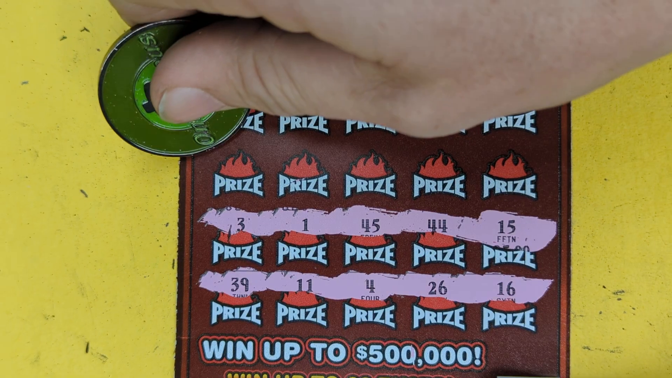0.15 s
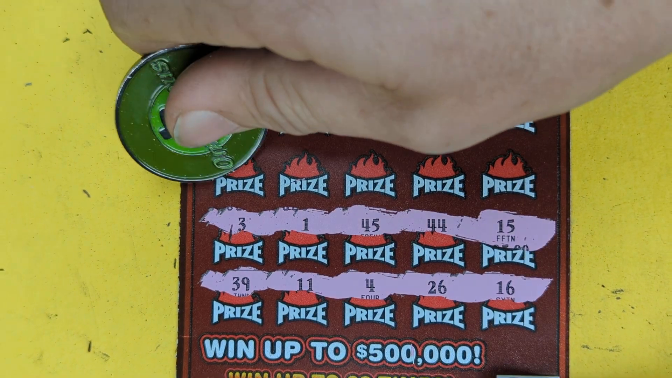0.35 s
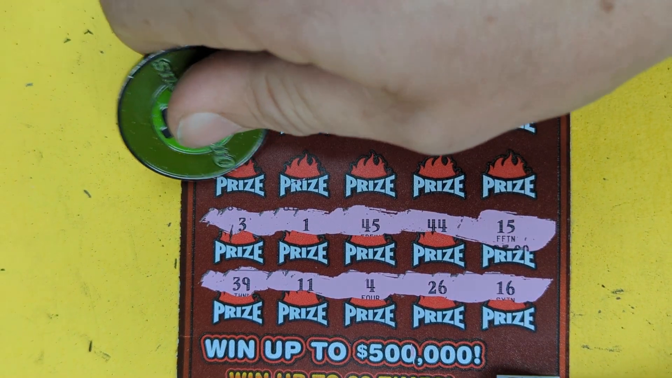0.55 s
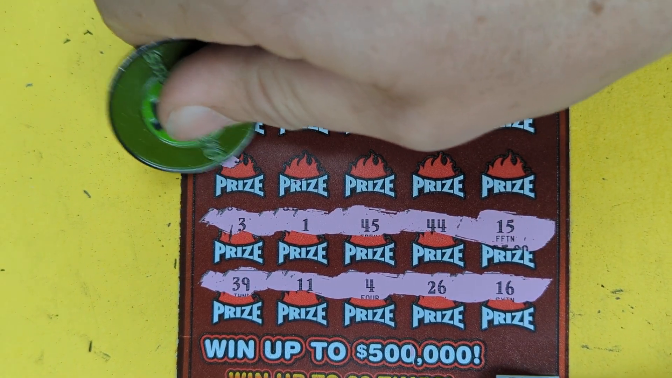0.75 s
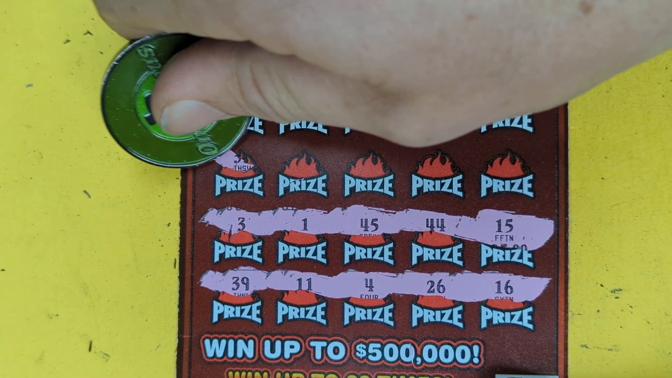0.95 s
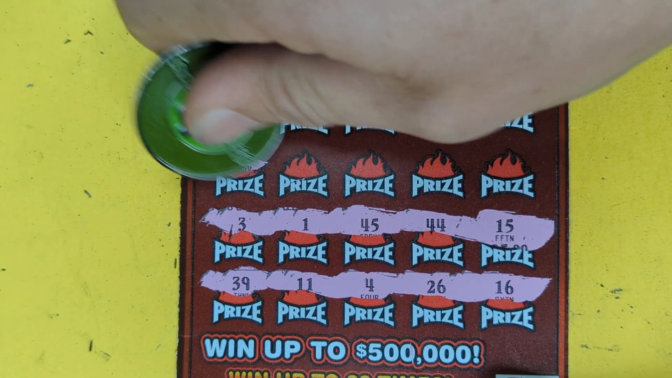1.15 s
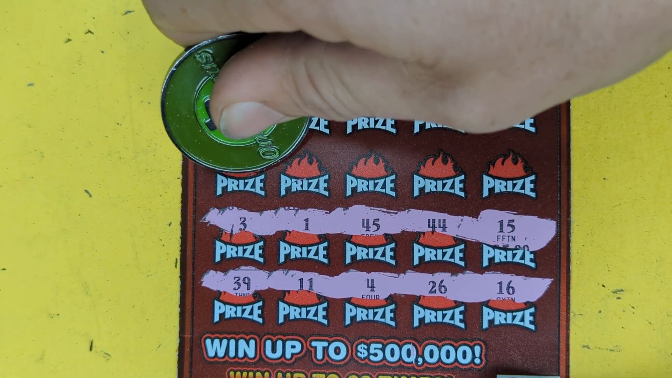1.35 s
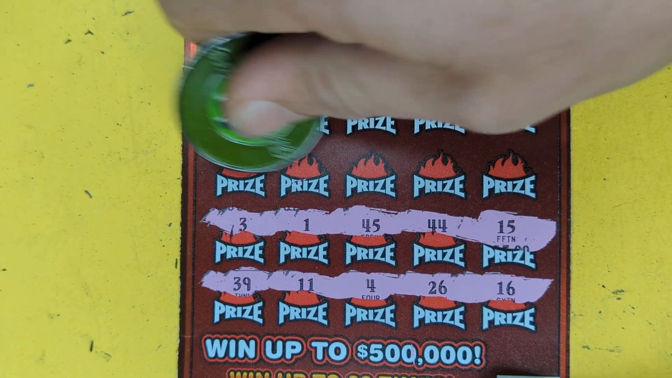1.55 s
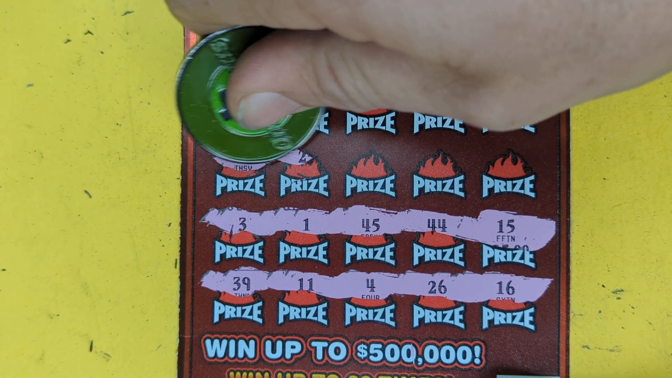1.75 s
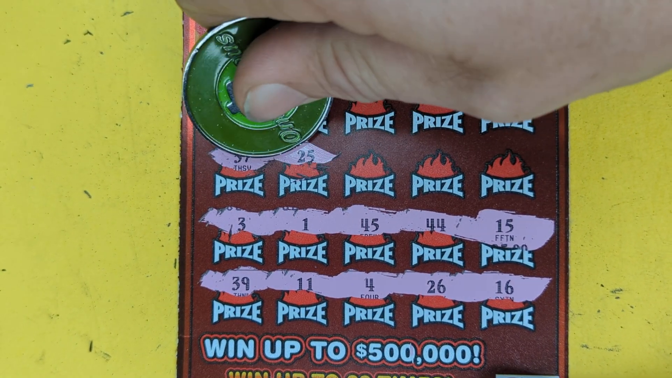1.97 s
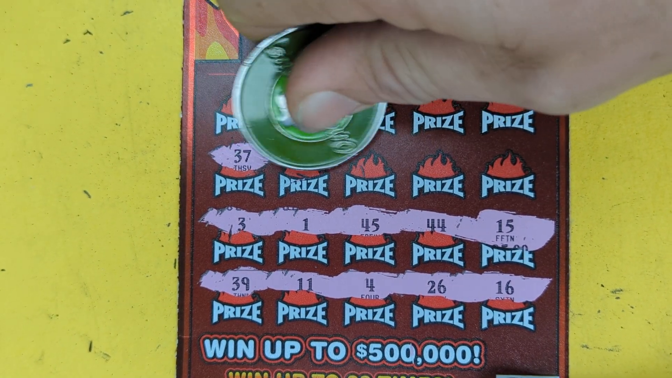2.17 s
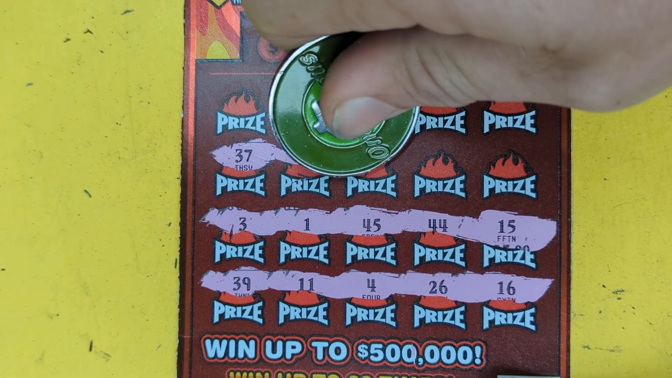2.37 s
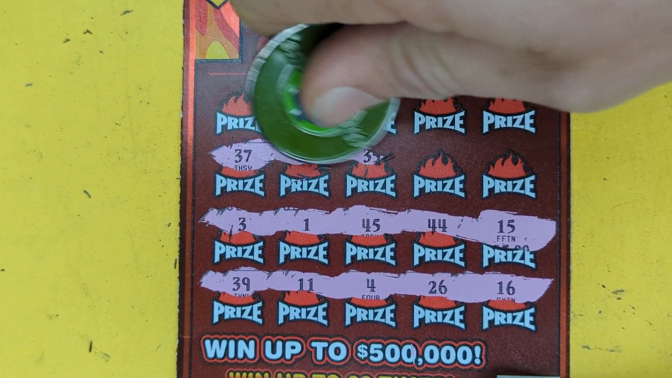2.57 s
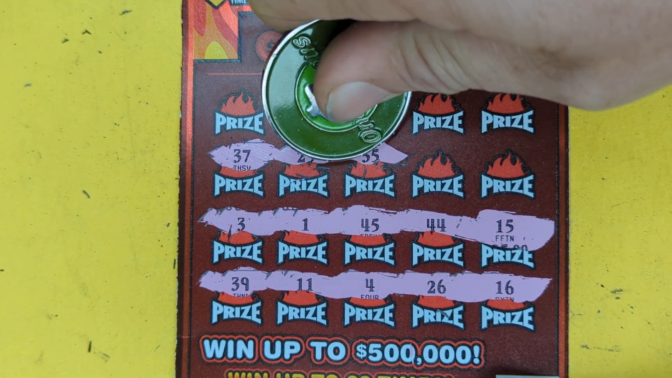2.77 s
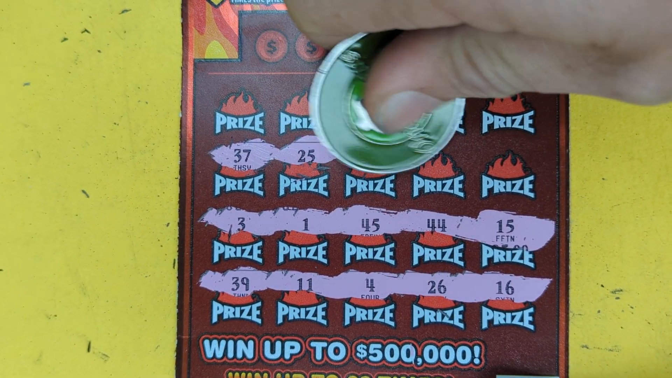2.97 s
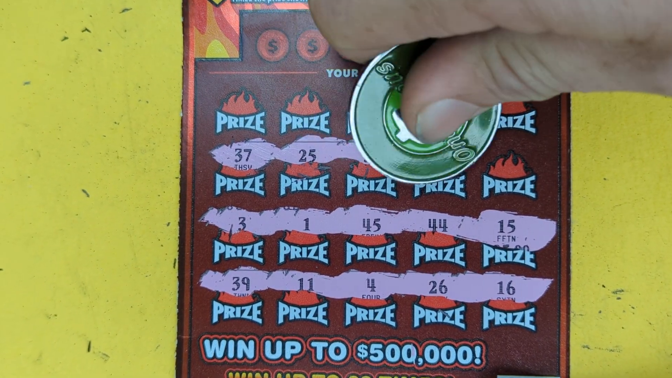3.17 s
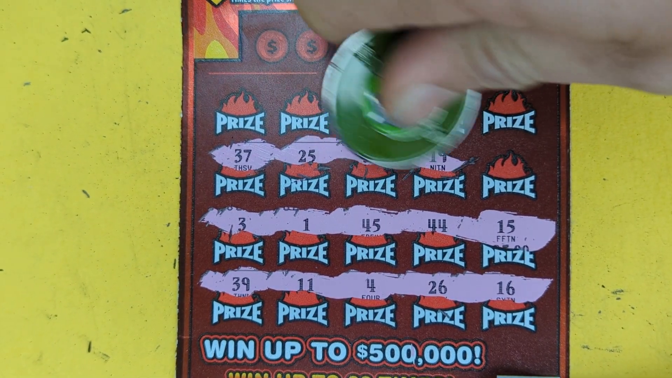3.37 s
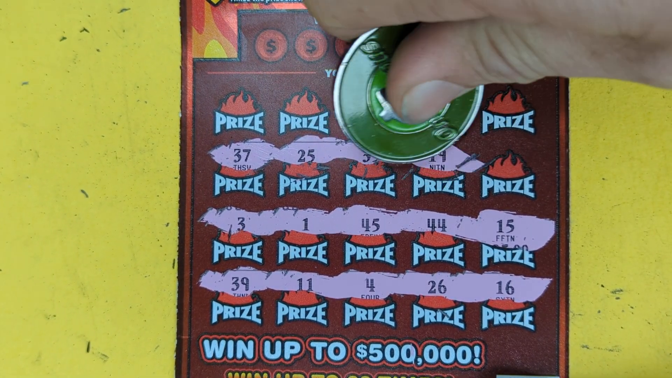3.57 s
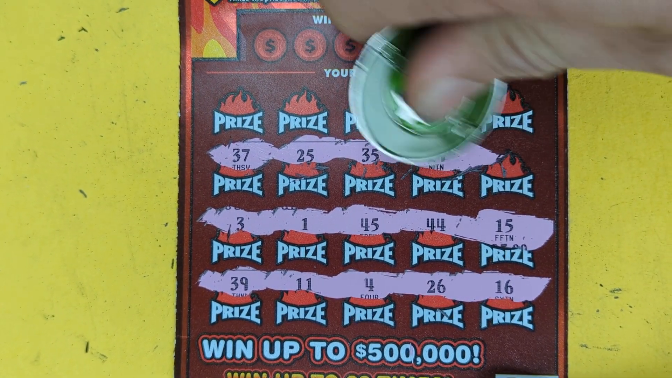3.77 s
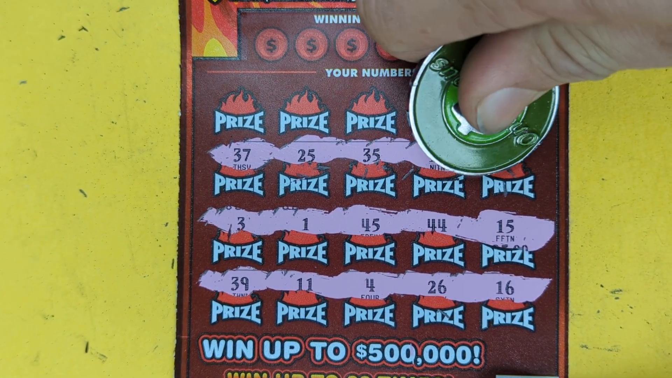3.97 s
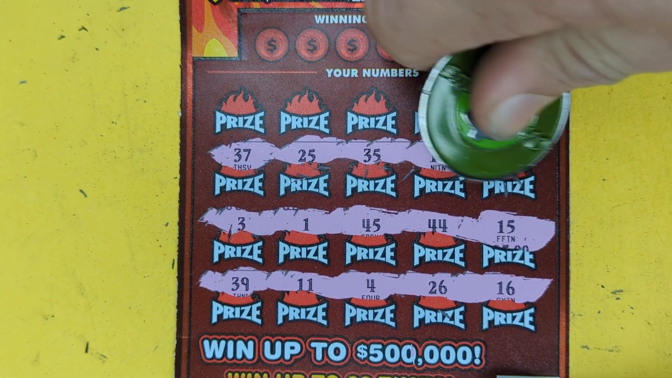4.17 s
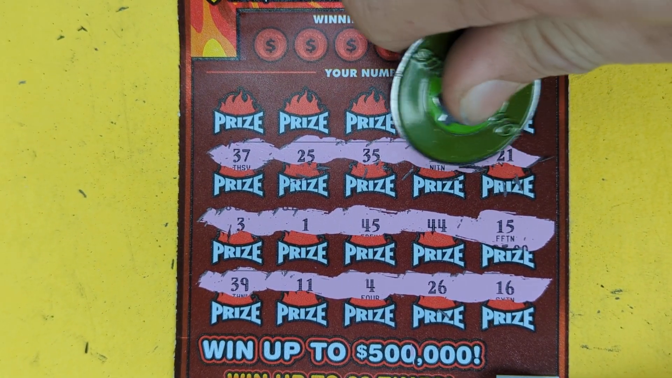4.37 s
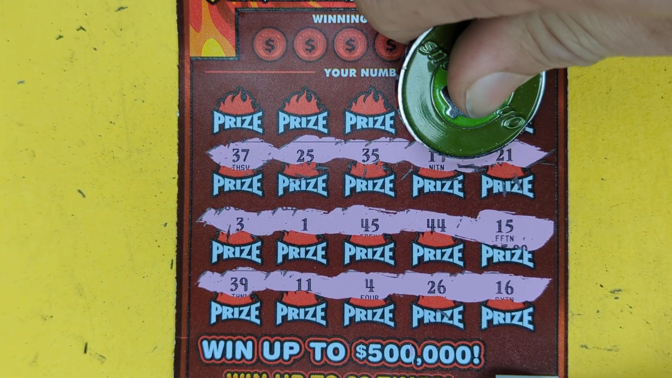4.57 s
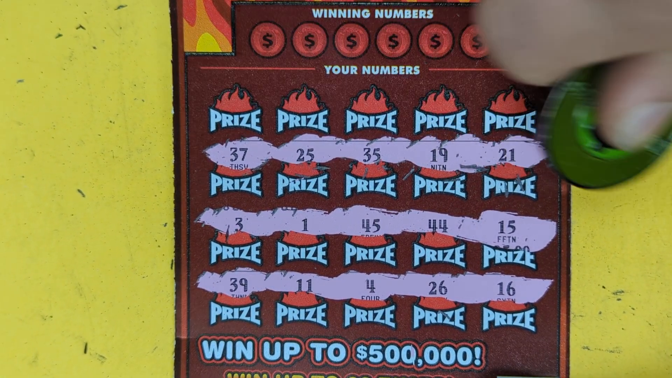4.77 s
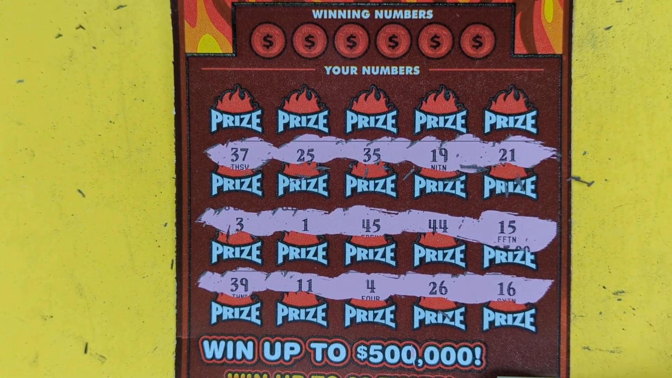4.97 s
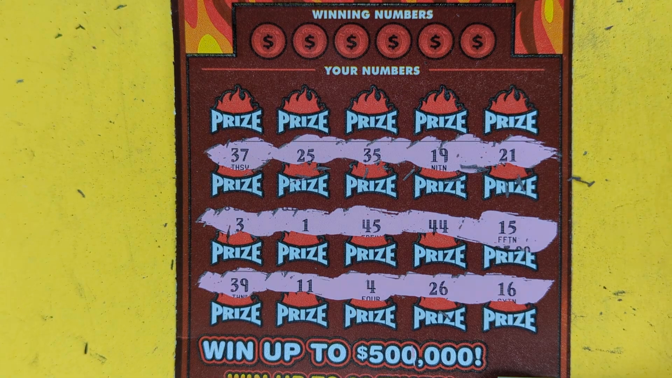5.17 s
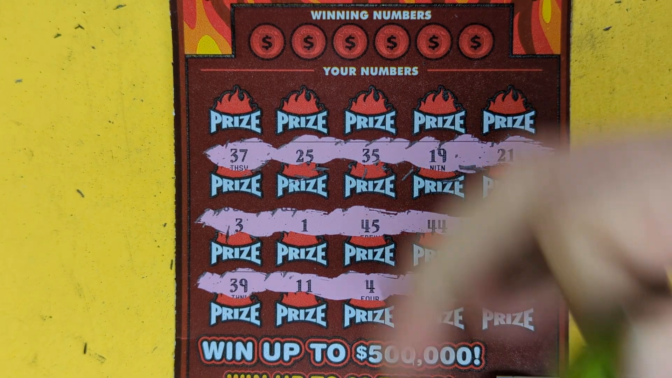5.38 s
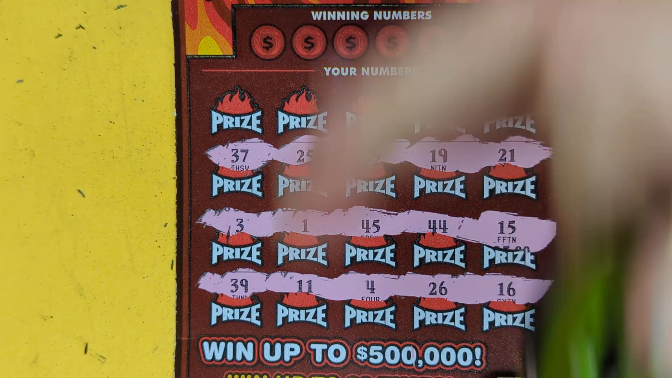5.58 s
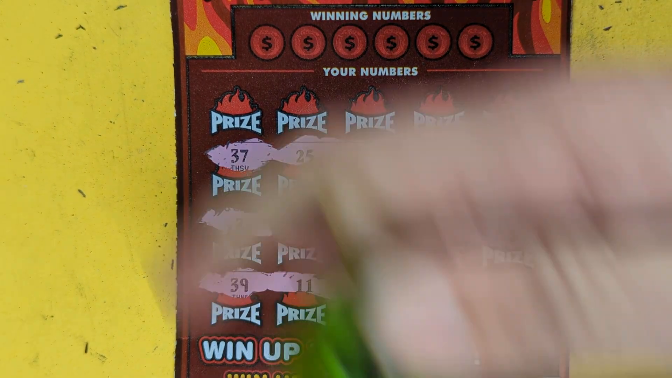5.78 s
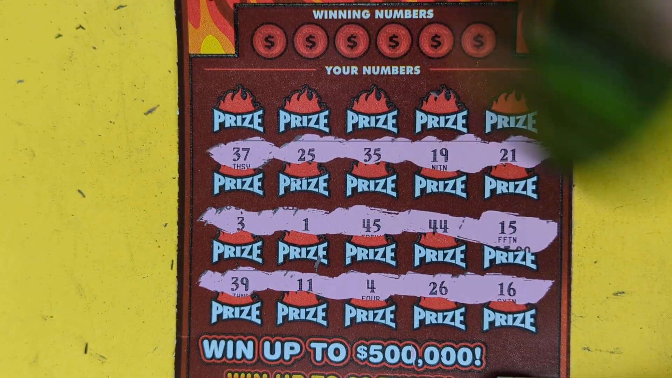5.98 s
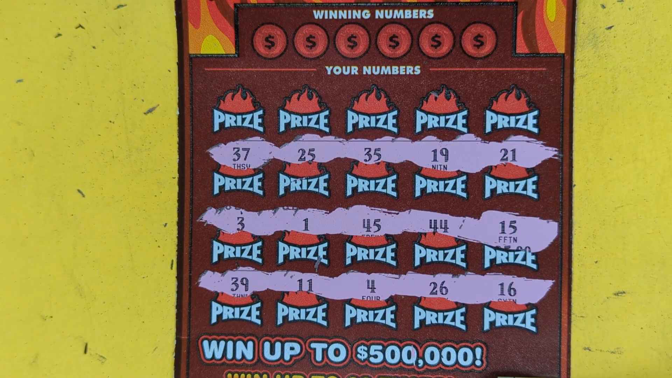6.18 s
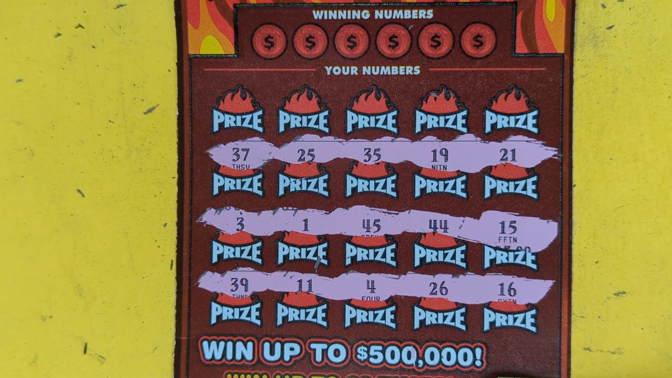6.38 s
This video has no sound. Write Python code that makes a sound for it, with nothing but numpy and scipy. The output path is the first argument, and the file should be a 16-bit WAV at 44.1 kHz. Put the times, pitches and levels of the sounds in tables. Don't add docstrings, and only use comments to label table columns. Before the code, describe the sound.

Rapid dry scratching of a hard disc on coated card, close up, followed by soft skin rustle, a flick and a swift hand sweep.

```python
import sys
import numpy as np
from scipy import signal
from scipy.fft import rfft, irfft, next_fast_len
from scipy.io import wavfile
from scipy.ndimage import uniform_filter1d

SR = 44100
rng = np.random.default_rng(int(sys.argv[2]) if len(sys.argv) > 2 else 0)


def voltage_ratio(decibels):
    exponent = np.asarray(decibels, float) / 20
    return 10 ** exponent


def dump_mix(stems):
    frames = np.atleast_2d(stems).T
    limited = np.clip(frames, -1, 1)
    pcm = np.round(limited * 32767).astype(np.int16)
    wavfile.write(sys.argv[1], SR, pcm)


N = 283563
SIZE = next_fast_len(N + 8192)
HZ = np.maximum(np.fft.rfftfreq(SIZE, 1 / SR), 1)
TIME = np.arange(N) / SR

# start in [s], length in [s], peak level in [dB],
# place of the peak in [0-1], bite of the rim in [dB].
PULLS = [(0.131, 0.23, -45, 1, -6), (0.577, 0.072, -37, 0.25, -6), (0.79, 0.095, -39.5, 0.41, -3.5),
         (1.049, 0.1, -37, 0.36, -2.5), (1.29, 0.116, -35, 0.47, -10), (1.544, 0.12, -33, 0.42, -7),
         (1.8, 0.11, -35, 0.44, -10), (2.054, 0.12, -34, 0.47, -10.5), (2.319, 0.12, -32.5, 0.48, -8.5),
         (2.59, 0.13, -34.5, 0.43, -5), (2.858, 0.13, -33, 0.39, -7), (3.108, 0.14, -34, 0.39, -3),
         (3.386, 0.11, -32.5, 0.47, -1), (3.626, 0.13, -33, 0.44, -3.5), (3.889, 0.119, -33.5, 0.42, -4.5),
         (4.177, 0.1, -33, 0.28, -8.5), (4.412, 0.11, -34.5, 0.46, -6), (4.683, 0.19, -33.6, 0.14, -2.7)]
# start in [s], length in [s], peak level in [dB],
# place of the peak in [0-1], bite of the rim in [dB].
PUSHES = [(0.42, 0.072, -34, 0.49, -12.5), (0.696, 0.059, -42, 0.43, -7.5),
          (0.94, 0.086, -37.5, 0.33, -8.5), (1.17, 0.094, -36, 0.58, -8.5),
          (1.435, 0.078, -38.5, 0.53, -8.5), (1.691, 0.072, -35.5, 0.52, -11),
          (1.937, 0.09, -34, 0.51, -10.5), (2.218, 0.071, -36.5, 0.59, -10),
          (2.474, 0.087, -35, 0.45, -11.5), (2.738, 0.081, -31, 0.4, -15), (3.016, 0.074, -36, 0.39, -7),
          (3.247, 0.097, -33.5, 0.43, -5.5), (3.516, 0.082, -32.5, 0.36, -7), (3.776, 0.08, -35.1, 0.6, -3),
          (4.048, 0.079, -37, 0.37, -6.5), (4.268, 0.1, -39, 0.81, -6), (4.561, 0.056, -32.5, 0.72, -5)]


def read(table):
    hz, value = np.transpose(table)
    return np.interp(np.log(HZ), np.log(np.maximum(hz, 1)), value)


def causal(db):
    cepstrum = irfft(db * np.log(10) / 20, SIZE)
    cepstrum[1:SIZE // 2] *= 2
    cepstrum[SIZE // 2 + 1:] = 0
    return np.exp(rfft(cepstrum))


def band(lo_hz, hi_hz):
    return 1 / ((1 + (lo_hz / HZ) ** 8) * (1 + (HZ / hi_hz) ** 8))


def through(x, response):
    return irfft(rfft(x, SIZE) * response, SIZE)[..., :N]


def unit(response):
    return response / np.sqrt(np.mean(abs(response) ** 2))


def room():
    # frequency in [Hz], density in [dB per Hz].
    rumble = [(25, -1), (55, -2), (73, 2.5), (100, -7), (170, -9), (210, -17.5), (330, -11.5), (500, -20),
              (1100, -35.5), (1600, -29), (3000, -33.5), (6000, -45.5), (16000, -54.5)]
    # frequency in [Hz], correlation in [0-1].
    likeness_rows = [(60, 0.99), (130, 0.52), (300, 0.27), (1000, 0), (15000, 0.26)]
    level_db = -50
    likeness = np.clip(read(likeness_rows), 0, 1)
    rumble_gain = voltage_ratio(read(rumble))
    noise = rng.standard_normal((2, N))
    mid = through(noise[0], rumble_gain * np.sqrt(1 + likeness))
    side = through(noise[1], rumble_gain * np.sqrt(1 - likeness))
    return np.array([mid + side, mid - side]) * voltage_ratio(level_db) / mid.std()


def grit(scatter_db, catch_db, catch_rate_hz):
    hold = max(int(SR / catch_rate_hz), 2)
    catch = np.repeat(rng.standard_normal(N // 2), hold)[:N]
    catch = uniform_filter1d(catch, hold)
    size = np.minimum(rng.exponential(size=N), 3.3)
    slip_db = scatter_db * size + catch_db * 1.54 * np.tanh(catch / 1.37)
    slips = rng.standard_normal((2, N)) * voltage_ratio(slip_db)
    return slips / slips.std()


def rub(slips, parts_db, body_db, edges_hz):
    ring = causal(body_db)
    out = np.zeros((2, N))
    for part_db, lo_hz, hi_hz in zip(parts_db, edges_hz, edges_hz[1:]):
        out += through(slips * voltage_ratio(part_db), unit(ring * band(lo_hz, hi_hz)))
    return out


def join(tables, fade_s):
    silent_db = -95
    rows = []
    for table in map(np.array, tables):
        first, last = table[0], table[-1]
        rows.append(np.r_[first[0] - 12 * fade_s, silent_db, first[2:]])
        rows.extend(table)
        rows.append(np.r_[last[0] + fade_s, silent_db, last[2:]])
    s, *columns = np.array(sorted(rows, key=lambda row: row[0])).T
    return [np.interp(TIME, s, column) for column in columns]


def hand():
    # frequency in [Hz], density in [dB per Hz].
    skin = [(100, 1.5), (350, 6), (900, -5), (1700, 2.5), (2600, 1), (4200, 0), (8000, 0.5), (11300, -0.5),
            (16000, -3)]
    # time in [s], brush level in [dB], weight of the hand in [dB].
    settle = [
        (0.0, -58.5, 3),
        (0.038, -65.5, 5.5),
        (0.088, -57, 7),
        (0.192, -60, 2),
        (0.36, -71.5, 22),
        (0.385, -109, 24),
    ]
    lift = [
        (4.78, -50, -8),
        (4.866, -60, 4.5),
        (4.904, -55.5, 2.5),
        (5.01, -61, 3),
        (5.03, -57.5, 11),
        (5.11, -59, 3),
        (5.135, -57.5, 7),
        (5.17, -60, -1.5),
        (5.34, -60.5, 0),
    ]
    flick = [
        (5.40, -54.5, -1),
        (5.492, -37.5, -14.5),
        (5.5, -41, -12),
        (5.574, -53, 1.5),
        (5.583, -88, 7),
        (5.6, -71.5, 8),
    ]
    sweep = [
        (5.66, -67.5, 10),
        (5.743, -61, 8.5),
        (5.79, -54, 1),
        (5.815, -47.5, -8),
        (5.845, -38.5, -12),
        (5.885, -41, -10),
        (5.916, -39.5, -9),
        (5.945, -47, -1),
        (5.982, -48.5, 2),
    ]
    rest = [
        (5.995, -56, 6.5),
        (6.08, -57.5, 1.5),
        (6.234, -63, 8.5),
        (6.3, -60.5, -3),
        (6.334, -55, 6),
        (6.38, -57, 5.5),
        (6.43, -55.5, 0),
    ]
    brush_db, weight_db = join([settle, np.concatenate([lift, flick, sweep, rest])], fade_s=0.0012)
    before, lifting = TIME < lift[0][0] / 2, TIME < flick[-1][0]
    rustle_db = np.select([before, lifting], [6.0, -5], -2) + 0.34 * weight_db
    hiss_db = -1.5 - 0.074 * weight_db + 0.29 * (brush_db + 53)
    parts_db = [brush_db + weight_db, brush_db + rustle_db, brush_db, brush_db + hiss_db]
    slips = grit(scatter_db=1.5, catch_db=2.0, catch_rate_hz=150.)
    return rub(slips, parts_db, read(skin), edges_hz=[150, 1050, 2450, 6800, 17000])


def bumps(hz, column):
    # frequency in [Hz], width in [Hz], height above surroundings in [dB],
    # gain as the rim crosses the card in [dB].
    rings = [(324.5, 71, 7.5, 11), (589, 49, 5, 3), (828, 216, 4.5, -2.5), (1128, 123, 7.0, -15.5),
             (1544, 110, 6, 1.5), (1900, 690, 4, 7), (2634, 270, 9.5, -0.5), (3090, 230, -4, 5),
             (4372, 120, 8, 19), (5080, 80, 0.5, 19), (5840, 310, 2.5, 11), (8040, 170, -18.5, -1),
             (11260, 380, 6, -9), (13200, 1200, -7, -15)]
    return sum(row[column] / (1 + (2 * (hz - row[0]) / row[1]) ** 2) for row in rings)


def body():
    # frequency in [Hz], density in [dB per Hz].
    scrape = [(35, -55.5), (60, 0.5), (168, 2.5), (437, -3), (1110, -1.5), (1410, -5.5), (2580, -10.5),
              (3190, -8.5), (5860, -13.5), (6740, -12.5), (10800, -13.5), (13000, -7.5), (16000, -11.5)]
    return read(scrape) + bumps(HZ, column=2)


def knocks():
    # time in [s], snap level in [dB], softness in [dB].
    turns = [(0.348, -43.5, 6), (0.546, -70, 25), (0.913, -65, 22), (2.715, -52, -12), (2.729, -48, -14),
             (2.98, -47, -10), (2.994, -45.5, -12), (3.158, -28.5, -14), (3.368, -57, 3), (3.454, -27, -8),
             (3.501, -47, 4), (3.76, -50, 6), (3.772, -49, -8), (4.028, -49, -15), (4.04, -45, -18),
             (4.284, -48, -5), (4.298, -42.5, -5), (4.385, -42, -6), (4.549, -44.5, -9), (4.561, -43, -6),
             (4.627, -42.5, -3), (4.734, -25.5, -3.5)]
    # time in [s], snap level in [dB], softness in [dB].
    hits = [(0.096, -42, -30), (5.023, -52, 8.5), (5.036, -59, 9), (5.132, -51, 4), (5.351, -44.5, -12),
            (5.484, -25.5, -17), (5.566, -34.5, -8), (5.717, -55, 17.5), (5.784, -54, 18),
            (5.869, -24, -13), (5.903, -36.5, 11.5), (5.97, -32.5, -3.5), (6.325, -40.5, -9),
            (6.371, -46, 1), (6.422, -39, -0.5)]
    # (lo Hz, hi Hz, rise s, decay s, trim dB, steady push against rattle)
    parts = [(128, 395, 0.0018, 0.00093, 4.5, 1.3),
             (1030, 4900, 0.00054, 0.004, 2.07, .01),
             (5460, 30000, 0.00045, 0.0034, 3.5, .01),
             (377, 1330, 0.00062, 0.0035, 3.5, 0.11)]
    blows = [*turns, *hits]
    age_s = np.arange(1024) / SR
    rattles = rng.standard_normal((len(blows), 2, len(age_s)))
    body_db = .5 * body()
    out = np.zeros((2, N))
    for part, (lo_hz, hi_hz, rise_s, decay_s, trim_db, push) in enumerate(parts):
        drive = np.zeros((2, N + len(age_s)))
        shape = (1 - np.exp(-(age_s / rise_s) ** 2)) * np.exp(-age_s / decay_s)
        for (s, snap_db, soft_db), rattle in zip(blows, rattles):
            tick_db = snap_db - 7.5 - 0.32 * soft_db
            knuckle_db = snap_db - 3.5 + 0.76 * soft_db
            part_db = (snap_db + soft_db, snap_db, tick_db, knuckle_db)[part]
            start = int(s * SR)
            drive[:, start:start + len(age_s)] += voltage_ratio(part_db + trim_db) * (push + rattle) * shape
        ring = causal(body_db + 10 * np.log10(band(lo_hz, hi_hz) + 1e-9))
        out += through(drive[:, :N], unit(ring))
    return out


def strokes():
    # start in [s], length in [s], peak level in [dB],
    # place of the peak in [0-1].
    slides = [
        (0.529, 0.057, -65, 0.7),
        (0.619, .04, -60, .3),
        (0.89, 0.059, -64, .55),
        (1.125, 0.042, -66, .33),
        (1.276, 0.039, -48.5, 0.64),
        (3.345, 0.068, -50.5, 0.63),
        (4.017, 0.063, -58, 1),
        (4.386, 0.036, -51, 0.53),
        (4.542, 0.032, -52, .8),
        (4.623, 0.13, -52, 0.3),
    ]
    swell = 3.06
    silent_db, drag_pull_db, drag_push_db, drag_db_per_s = -95, -81, -78, 2.5
    ends = [(s + length_s, drag_pull_db) for s, length_s, *_ in PULLS]
    ends += [(s + length_s, drag_push_db) for s, length_s, *_ in PUSHES]
    end_s, drag_db = np.array(sorted(ends)).T
    power = voltage_ratio(2 * np.interp(TIME, end_s, drag_db + drag_db_per_s * end_s, silent_db, silent_db))
    for s, length_s, db, top, *_ in [*PULLS, *PUSHES, *slides]:
        start = int(s * SR)
        u = np.linspace(0, 1, int(length_s * SR))
        top = np.clip(top, .05, .95)
        speed = (u / top) ** (swell * top) * ((1 - u) / (1 - top)) ** (swell * (1 - top))
        stuck = (u < top) & (speed < .25)
        power[start:start + len(u)] += (voltage_ratio(db) * np.where(stuck, 0.79 * speed, speed)) ** 2
    return 10 * np.log10(power)


def grip(x, patchy_db, hold_s, spread_hz):
    hz, s, z = signal.stft(x, SR, nperseg=512, noverlap=384)
    patches = rng.standard_normal(z.shape[1:])
    for _ in range(2):
        patches = uniform_filter1d(patches, max(int(spread_hz / hz[1]), 1), axis=0)
        patches = uniform_filter1d(patches, max(int(hold_s / s[1]), 1), axis=1)
    patches /= patches.std()
    place = np.clip(s / PULLS[-1][0], 0, 1) - .5
    db = patchy_db * patches * np.minimum(hz / 600.0, 1)[:, None]
    db += np.outer(bumps(hz, column=3), place)
    db -= 22 * np.clip(2.5 * patches + .4, 0, 1) / (1 + ((hz - 13400) / 1700) ** 6)[:, None]
    return signal.istft(z * voltage_ratio(db), SR, nperseg=512, noverlap=384)[1][:, :N]


def scraping():
    lean_pull_db, lean_push_db, lean_db_per_s = 3, -2.5, -2
    rows = [(s + length_s / 2, bite_db, lean_pull_db) for s, length_s, _, _, bite_db in PULLS]
    rows += [(s + length_s / 2, bite_db, lean_push_db) for s, length_s, _, _, bite_db in PUSHES]
    middle_s, bite_db, lean_db = np.array(sorted(rows)).T
    chip_db = np.interp(TIME, middle_s, bite_db)
    table_db = np.interp(TIME, middle_s, lean_db) + lean_db_per_s * TIME
    flakes_db = -14.5 + 0.43 * chip_db + 2 * TIME
    scrape_db = strokes()
    card_db = scrape_db - 10 * np.log10(1 + voltage_ratio(2 * chip_db))
    speed_db = np.maximum(scrape_db + 38.5, -20)
    parts_db = [card_db + table_db - 0.46 * speed_db,
                card_db,
                card_db + chip_db + 0.56 * speed_db,
                card_db + flakes_db + 0.4 * speed_db]
    slips = grit(scatter_db=3.5, catch_db=1.5, catch_rate_hz=200.)
    sound = rub(slips, parts_db, body(), edges_hz=[50, 480, 2100, 7200, 17000])
    return grip(sound, patchy_db=2.5, hold_s=.03, spread_hz=260.)


def ports(streams):
    # frequency in [Hz], left minus right in [dB].
    balance = [(60, 2.5), (110, 4.5), (200, 5.5), (380, 4), (700, 12.5), (1290, 6), (2380, 6.5),
               (4400, 6.5), (8120, 6), (15000, 3)]
    # frequency in [Hz], lead of the left in [rad].
    lead = [(0, 0), (1210, 1.29), (2580, 1), (3270, -1.5), (4740, 12.5), (5940, 7), (6980, 2.5),
            (9040, 26.5), (9390, 20), (10900, 20.5), (12100, 30.5), (12800, 29), (15100, 14), (16000, 36)]
    # frequency in [Hz], share in [0-1].
    shared_rows = [(100, 1), (1000, 0.9), (3000, 0.18), (6000, 0.14), (15000, 0.43)]
    # time in [s], extra left minus right in [dB].
    drift = [
        (0, -2.5),
        (.4, 0),
        (1.2, -1),
        (2.5, -3),
        (4, -1),
        (5.3, -6),
        (5.9, -2),
        (6.43, -12.5),
    ]
    shared = np.clip(read(shared_rows), 0, 1)
    lead_rad = np.interp(HZ, *np.transpose(lead))
    tilt = voltage_ratio(read(balance) / 2) * np.exp(.5j * lead_rad)
    left = through(streams[0], tilt)
    right = through(streams[0], np.sqrt(shared) / tilt)
    right += through(streams[1], np.sqrt(1 - shared) / abs(tilt))
    drift_db = np.interp(TIME, *np.transpose(drift))
    return np.array([left * voltage_ratio(drift_db / 2), right * voltage_ratio(-drift_db / 2)])


def scene():
    return ports(scraping() + hand() + knocks()) + room()


def band_limit(x):
    return signal.sosfilt(signal.butter(12, 15950, fs=SR, output="sos"), x)


def record(dry):
    top_hz = 15900
    bass_cut_db = -10 * np.log10(1 + (58 / HZ) ** 8)
    dip_db = -5.0 / (1 + (2 * (HZ - 13600.) / 1800.0) ** 2)
    mix = through(dry, causal(bass_cut_db + dip_db) * (HZ < top_hz))
    return band_limit(mix)


dry = scene()
out = record(dry)
dump_mix(out)
```